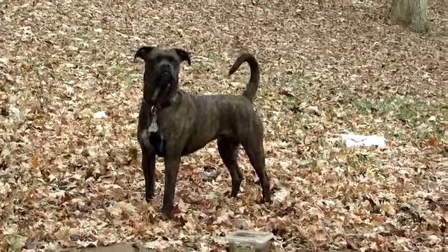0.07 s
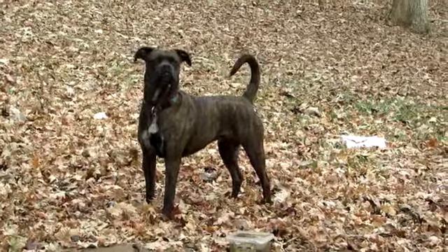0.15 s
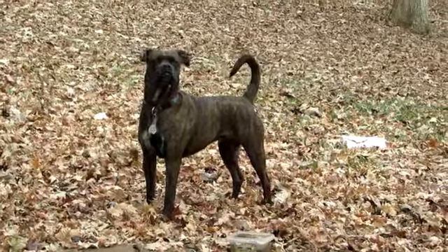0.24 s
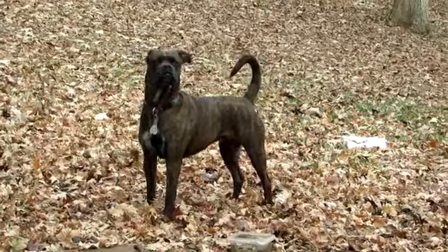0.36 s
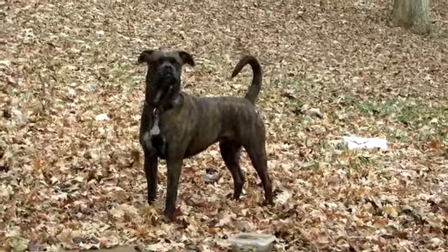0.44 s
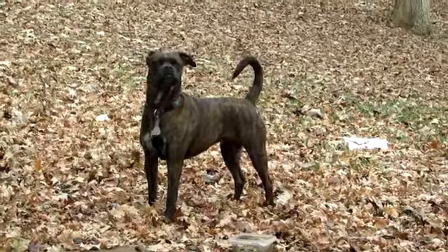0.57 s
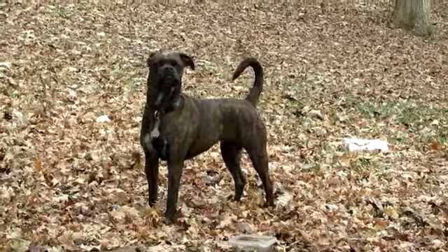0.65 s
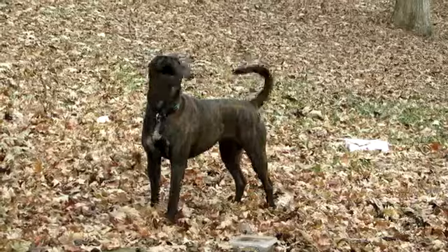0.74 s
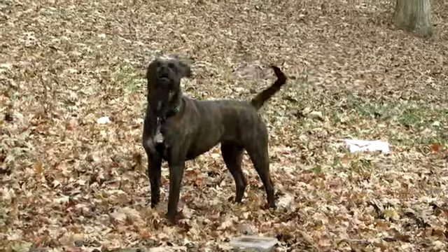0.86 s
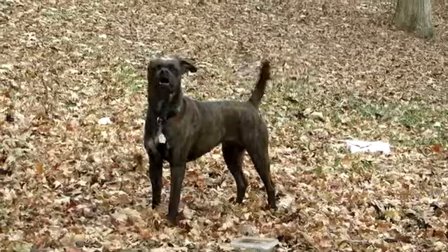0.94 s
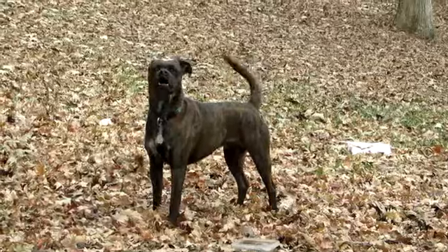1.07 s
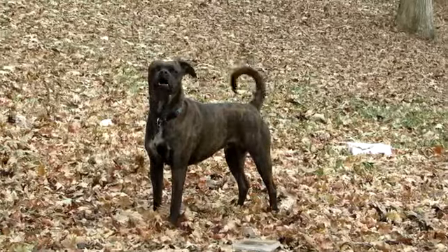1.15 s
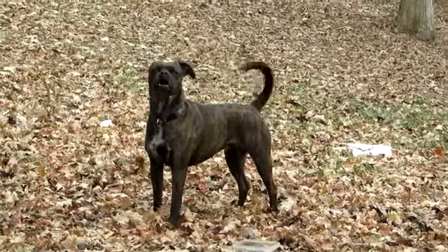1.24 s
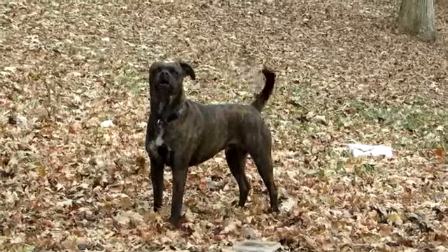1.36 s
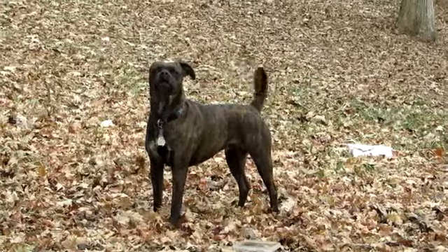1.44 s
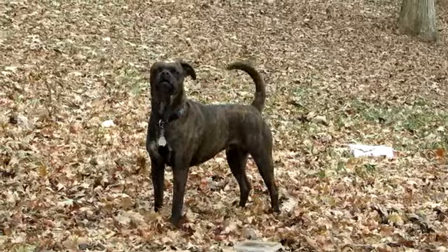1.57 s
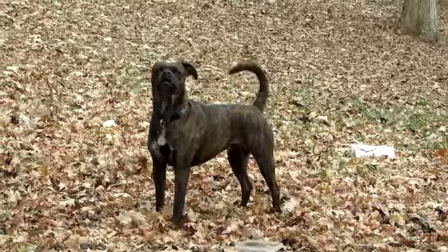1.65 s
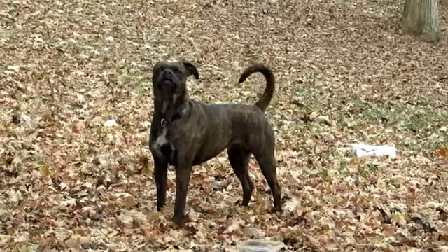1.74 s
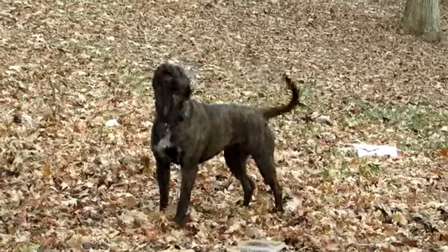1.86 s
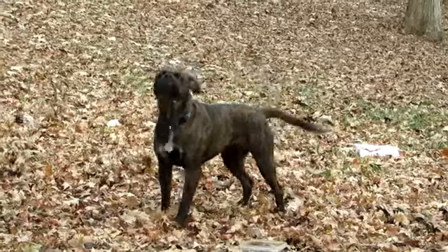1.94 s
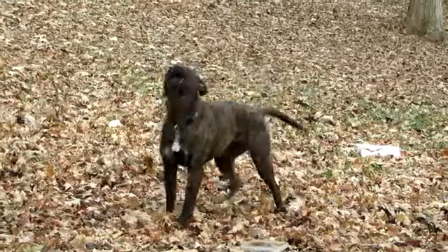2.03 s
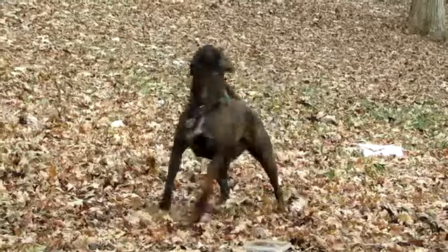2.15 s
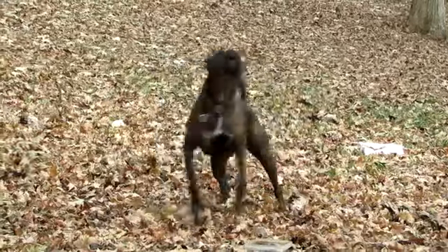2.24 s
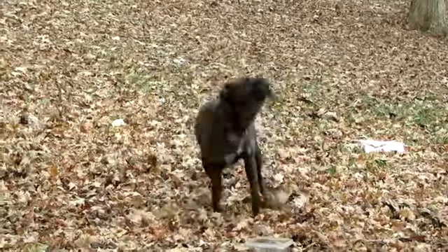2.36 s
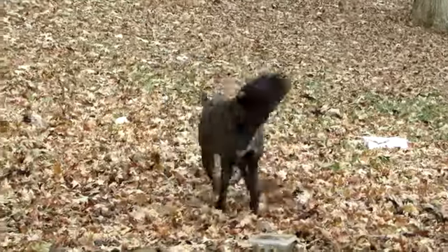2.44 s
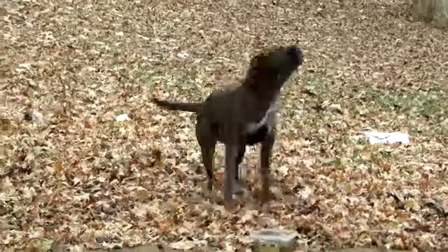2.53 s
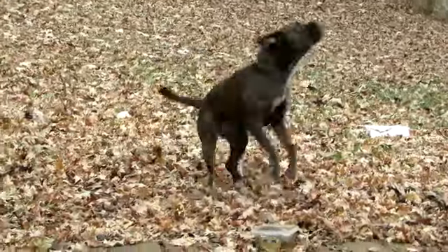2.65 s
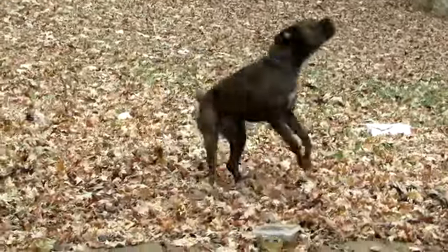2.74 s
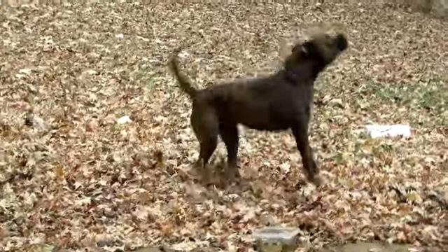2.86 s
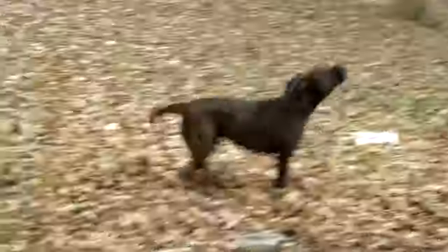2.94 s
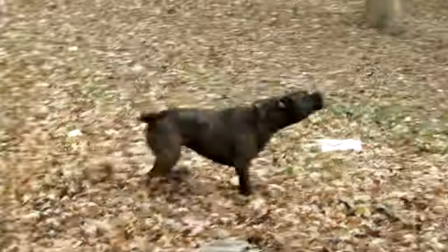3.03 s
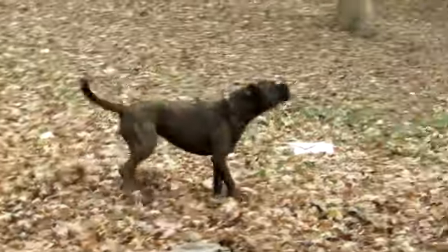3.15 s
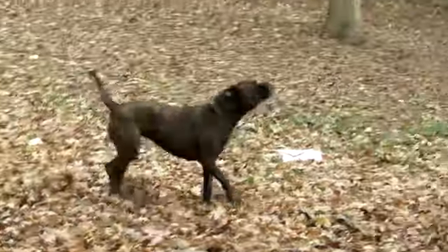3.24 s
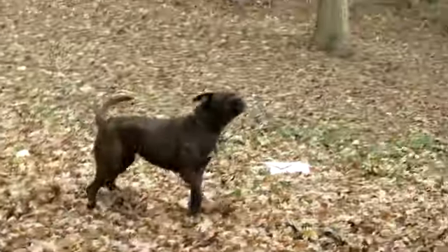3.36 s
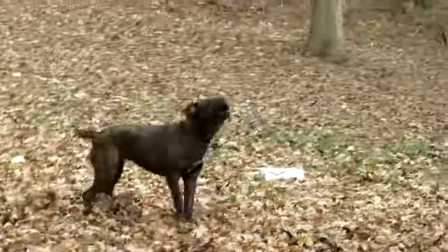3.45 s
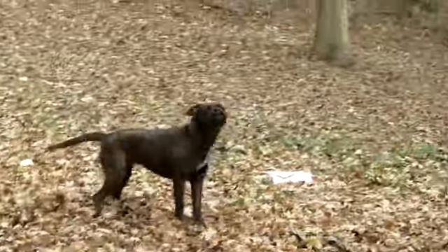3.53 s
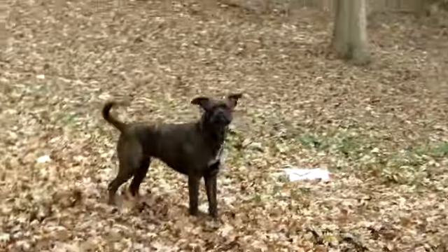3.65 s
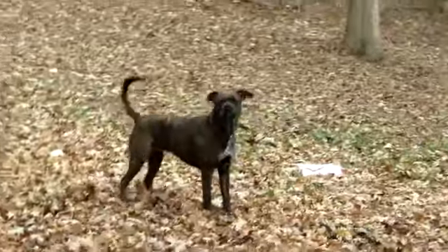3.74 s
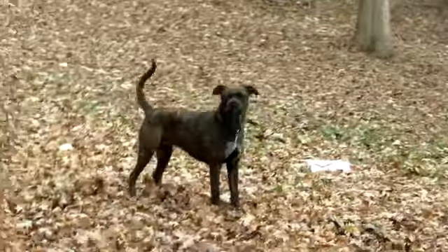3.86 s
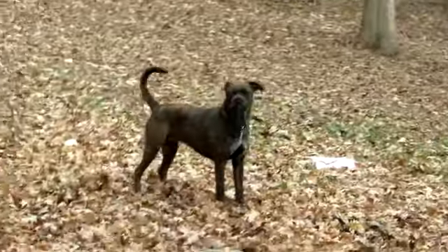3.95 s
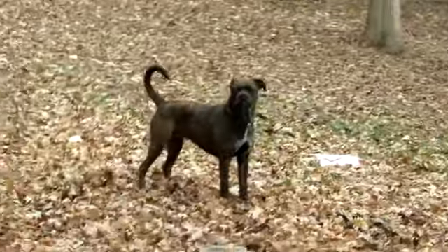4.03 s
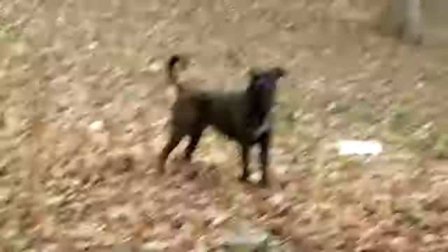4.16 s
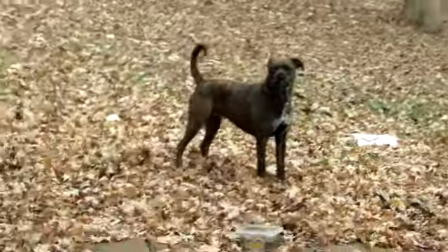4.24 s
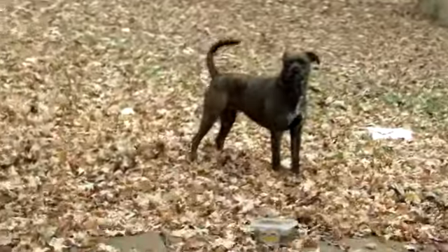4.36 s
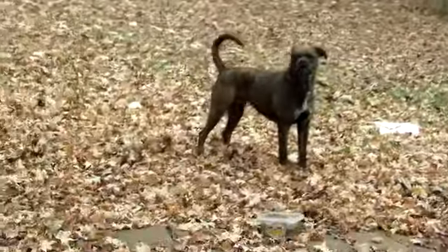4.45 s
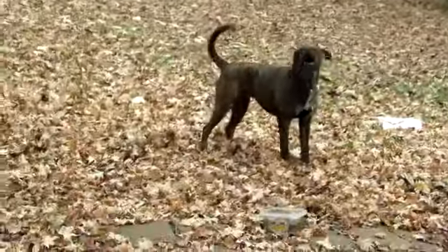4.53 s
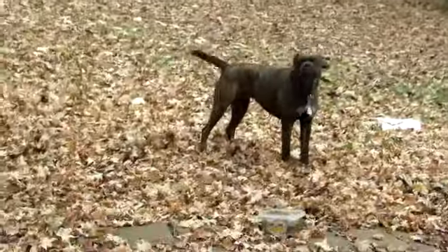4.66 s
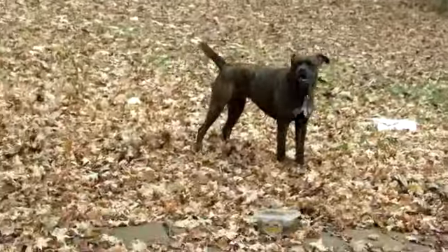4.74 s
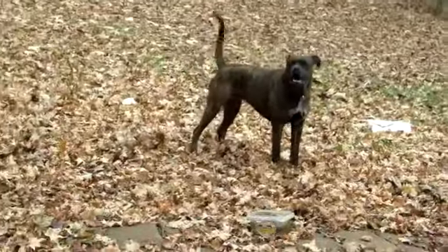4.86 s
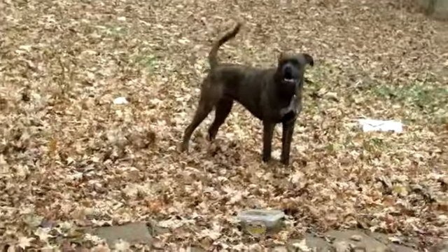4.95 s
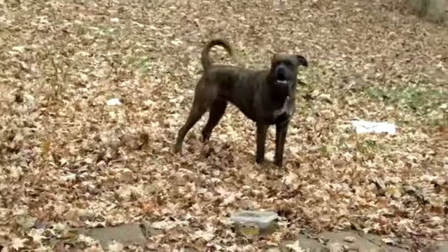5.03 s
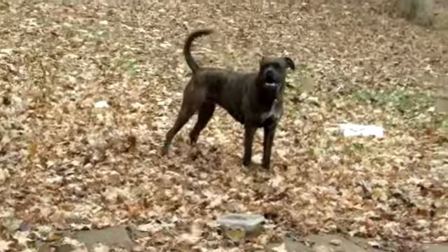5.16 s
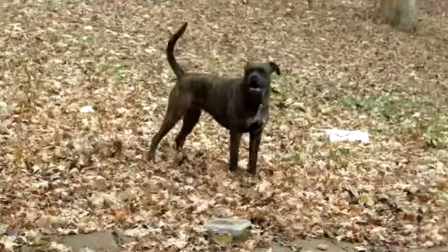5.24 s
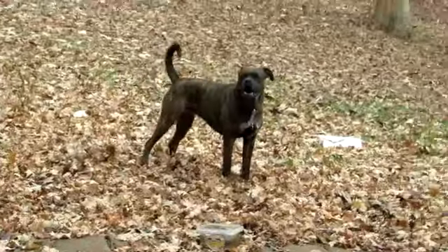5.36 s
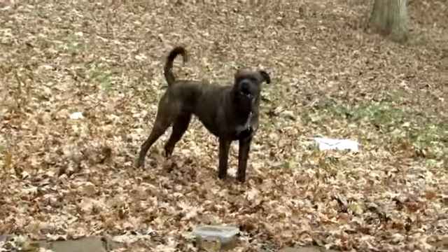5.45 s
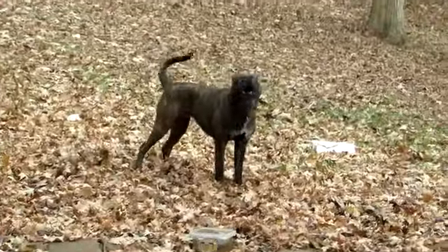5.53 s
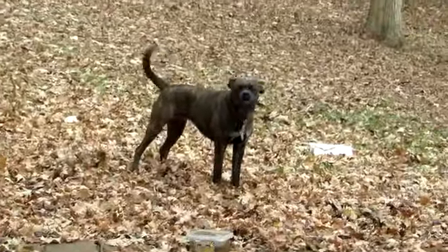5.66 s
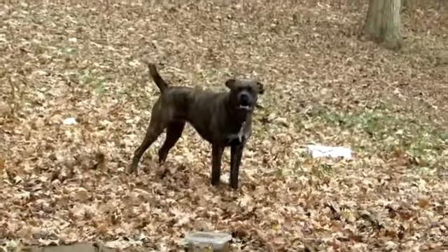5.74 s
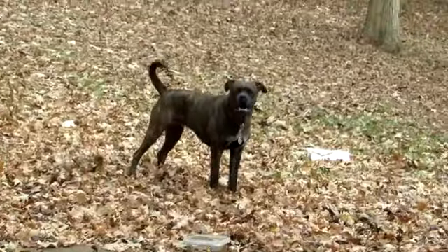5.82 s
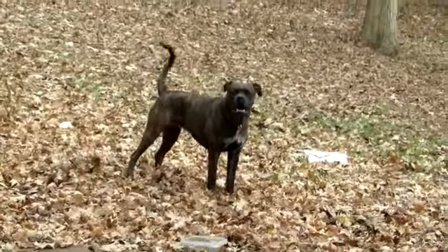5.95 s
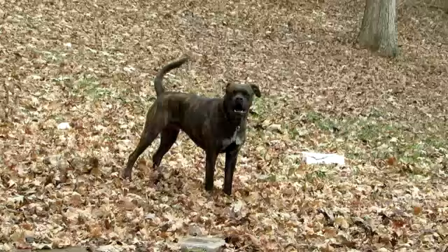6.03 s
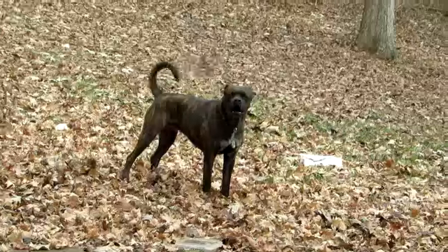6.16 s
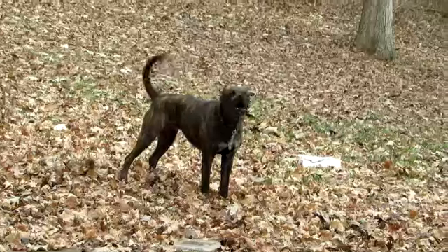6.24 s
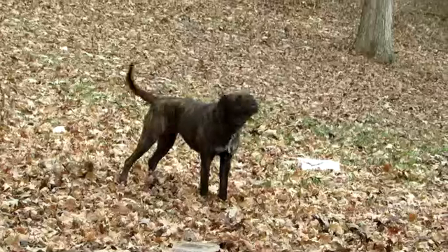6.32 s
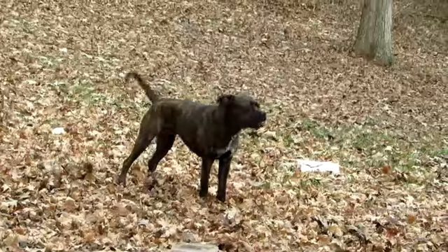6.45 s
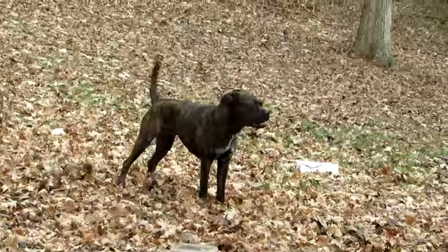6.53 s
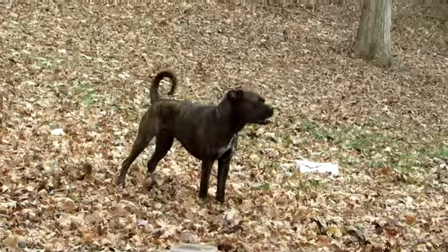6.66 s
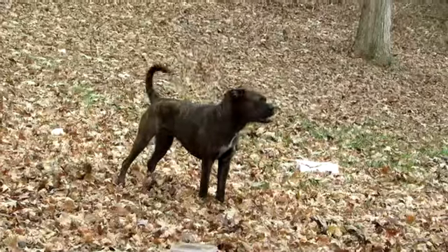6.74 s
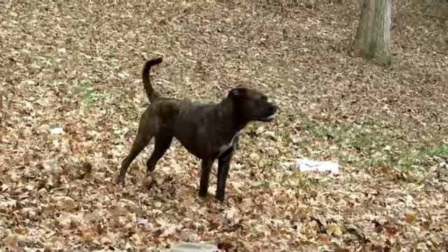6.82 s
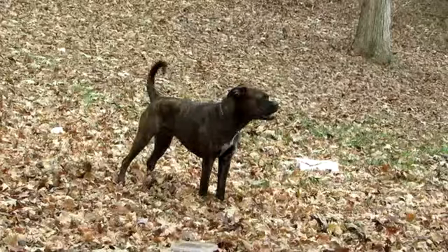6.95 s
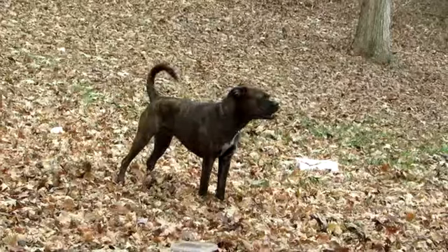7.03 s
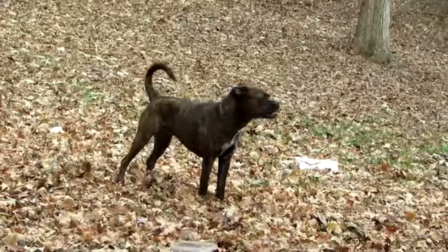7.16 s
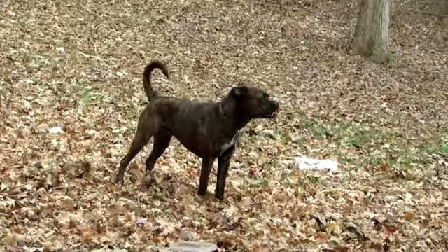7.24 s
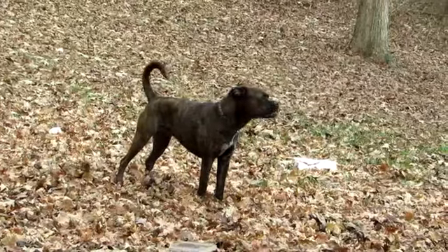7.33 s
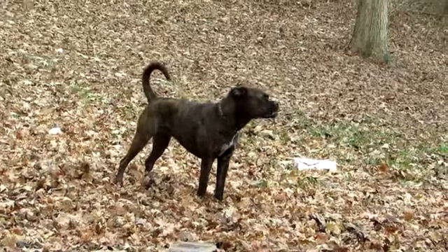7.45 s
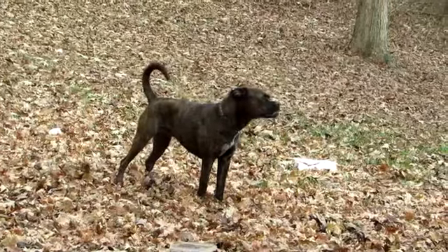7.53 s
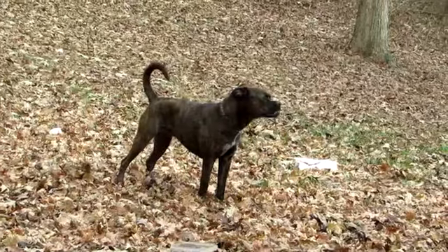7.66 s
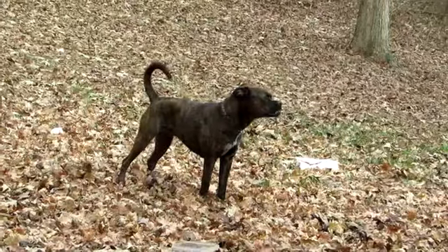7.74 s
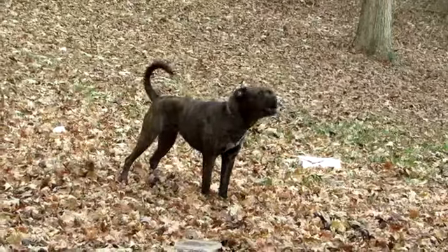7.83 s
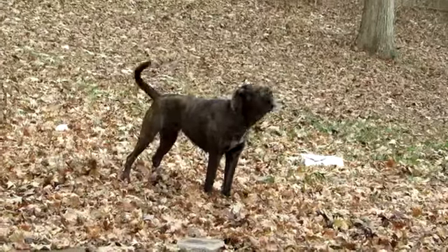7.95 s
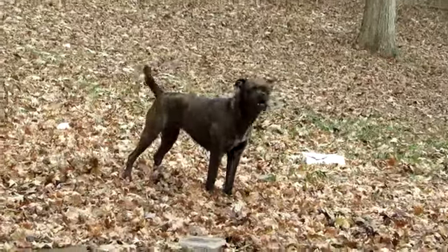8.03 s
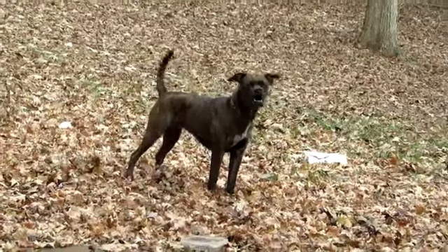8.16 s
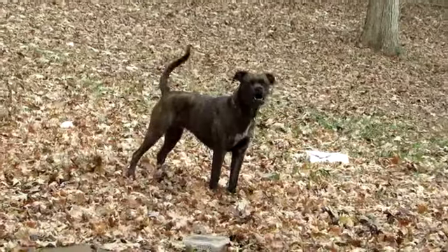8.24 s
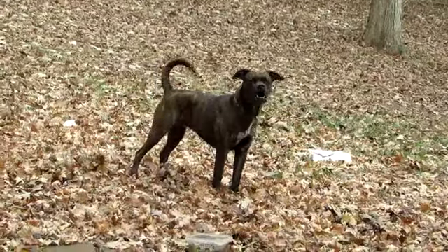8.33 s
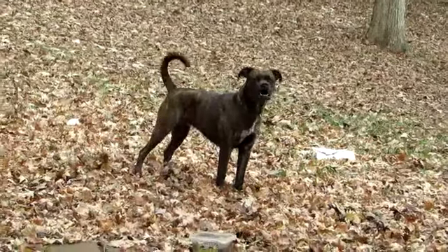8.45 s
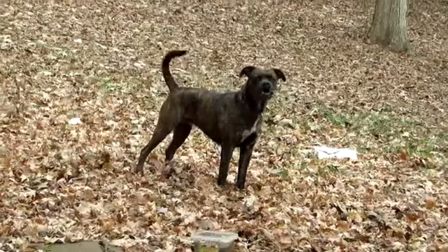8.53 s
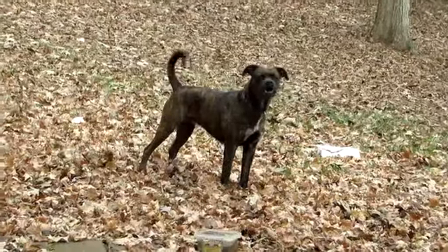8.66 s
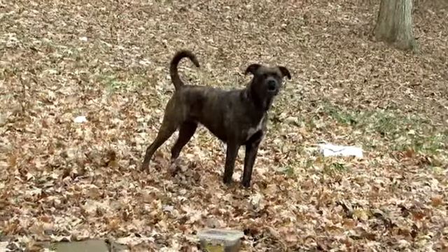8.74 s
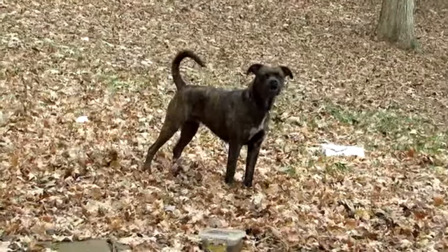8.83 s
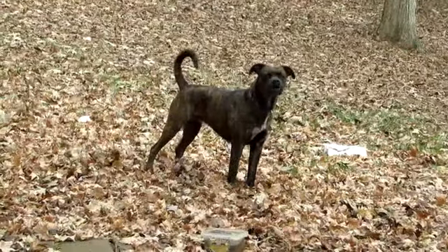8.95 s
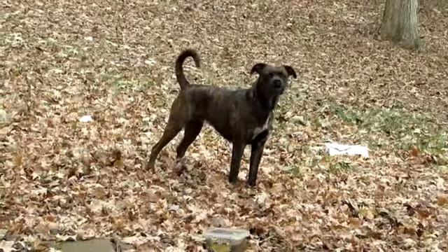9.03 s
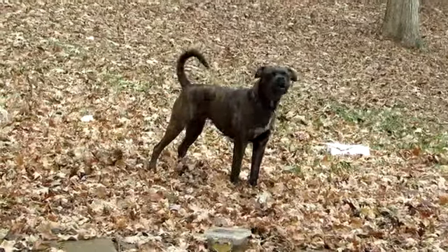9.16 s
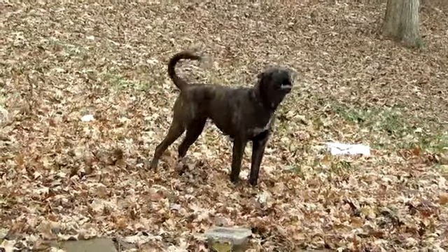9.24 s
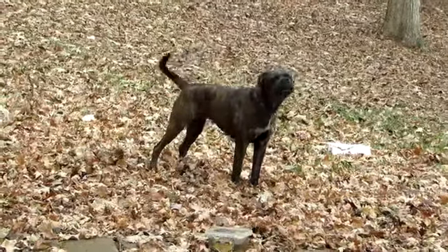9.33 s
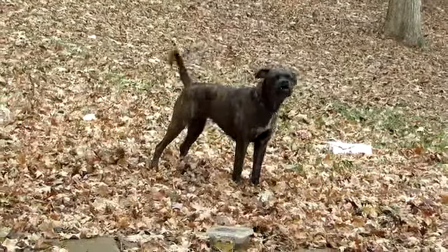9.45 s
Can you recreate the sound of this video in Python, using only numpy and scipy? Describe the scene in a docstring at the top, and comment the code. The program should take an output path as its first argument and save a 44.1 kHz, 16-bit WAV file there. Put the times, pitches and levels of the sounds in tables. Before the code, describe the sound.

Over a faint hum of far traffic, a big dog's rough barks echo around a yard. After the first two it breaks into rapid yelps and a soft rolling howl, with dry leaves crackling underfoot. A sharp snort follows, then spaced single barks to the end. The dog is a few metres off, while a light rattle and a few low bumps are right at the microphone.

```python
"""A leaf-covered suburban yard, with a large dog a few metres from a stereo microphone.
It gives single barks, hoarse where its vocal folds split, and one burst of yelps around a rolling howl.
It scuffs dry leaves as it turns, and snorts; houses and trees return a long echo.
Distant traffic hums throughout and a thin whistle sounds far off. Dry clicks, a light rattle and
low thumps sound close to the microphone, and gain control ducks a little under each bark."""
import sys
import numpy as np
from scipy import signal
from scipy.fft import rfft, irfft, next_fast_len
from scipy.io import wavfile
from scipy.ndimage import uniform_filter1d

SR = 44100
rng = np.random.default_rng(int(sys.argv[2]) if len(sys.argv) > 2 else 0)


def to_wav(sig):
    """Store sig (one row per channel, or 1-D mono) as 16-bit WAV at the path in sys.argv[1].

    Samples outside -1..1 are clipped; the rate is SR.
    """
    pcm = np.clip(np.atleast_2d(sig), -1, 1) * 32767
    pcm = np.round(pcm).astype(np.int16)
    wavfile.write(sys.argv[1], SR, pcm.T)  # frames by channels


N = 418509


def amp(db):
    """Decibels to gain."""
    return 10 ** (np.asarray(db) / 20)


def unit_rms(x):
    """Scales to rms 1."""
    return x / np.sqrt(np.mean(x ** 2) + 1e-20)


def value_at(points, hz):
    """Reads a spectrum on a log-frequency axis."""
    f, value = np.transpose(points)
    return np.interp(np.log(hz + 1), np.log(f + 1), value)


def add(mix, s, sound):
    """Mixes a sound in at time s."""
    part = mix[round(s * SR):][:len(sound)]
    part += sound[:len(part)]


def curves(rows):
    """Sample times, and a table's columns interpolated at them."""
    s, *columns = np.transpose(rows)
    t = np.arange(s[0], s[-1], 1 / SR)
    return t, [np.interp(t, s, c) for c in columns]


def coloured(x, points):
    """Filters by a spectrum of (f/Hz, level/dB) points, to rms 1."""
    size = next_fast_len(len(x) + 2048)
    gain = amp(value_at(points, np.fft.rfftfreq(size, 1 / SR)))
    return unit_rms(irfft(rfft(x, size) * gain, size)[:len(x)])


def wander(count, hz):
    """Random drift up to about hz, rms 1."""
    drift = signal.lfilter(*signal.butter(2, hz, fs=SR), rng.standard_normal(count + 4000))
    return unit_rms(drift[4000:])


def resonate(x, hz, width_hz):
    """A resonance of gain 1 that can glide: shifts hz down to zero, smooths, and shifts back."""
    turn = np.exp(2j * np.pi * np.cumsum(hz * np.ones(len(x))) / SR)
    pole = np.exp(-np.pi * width_hz / SR)
    return 2 * (turn * signal.lfilter([1 - pole], [1, -pole], x / turn)).real


def resonate_twice(x, hz, width_hz):
    """A resonance with steeper skirts."""
    return resonate(resonate(x, hz, width_hz), hz, width_hz)


# Distant traffic as it reaches the yard: f/Hz, relative level/dB
TRAFFIC_SPECTRUM = [(12, -40), (20, -11.5), (77, -5), (161, -8.5), (302, -10.5), (536, -12), (650, -12),
                    (1010, -16.5), (2860, -29), (3970, -32.5), (4940, -31.5), (10400, -39.5), (14000, -48)]
# Slow swell of its treble: t/s, relative level/dB
TRAFFIC_SWELL = [(0, -51), (1.2, -55), (4.5, -48.5), (6.5, -53.5), (9.5, -53)]
# Its likeness on the two sides of the microphone: f/Hz, correlation (clipped to +-1)
TRAFFIC_LIKENESS = [(25, -1.1), (70, 0.87), (240, 0.02), (930, 0.24), (3640, 0.26), (12000, -0.12)]
# Hums of the suburb: f/Hz, width/Hz, level/dB
HUMS = [(77.4, 13.4, -50), (115.2, 12, -61.5), (150.3, 10.8, -59), (533.5, 20, -61)]
def traffic():
    """Far from the microphone, a wash of traffic noise with drifting patches, and wavering hums."""
    frames, hz = N // 256 + 5, np.fft.rfftfreq(1024, 1 / SR)
    left_re, left_im, other_re, other_im, patches = rng.standard_normal((frames, 513, 5)).T
    patches = unit_rms(uniform_filter1d(uniform_filter1d(patches, 14, 0), 40, 1))
    swell_db = np.interp(np.arange(frames) * 256 / SR, *np.transpose(TRAFFIC_SWELL))
    treble = np.clip(np.log2(hz / 500 + 1e-9) / 0.28, 0, 1)[:, None]
    likeness = np.clip(value_at(TRAFFIC_LIKENESS, hz), -1, 1)[:, None]
    left = left_re + 1j * left_im
    right = likeness * left + np.sqrt(1 - likeness ** 2) * (other_re + 1j * other_im)
    shape_db = value_at(TRAFFIC_SPECTRUM, hz)[:, None] + 1.5 * patches
    spectra = np.array([left, right]) * amp(shape_db + treble * (swell_db - swell_db.mean()))
    wash = amp(-46) * unit_rms(signal.istft(spectra, nperseg=1024, noverlap=768)[1][:, :N])
    hums = sum(amp(db) * unit_rms(resonate_twice(rng.standard_normal(N), f, w)) for f, w, db in HUMS)
    return wash + hums


# Decay of the echo among houses and trees: f/Hz, t60/s
ECHO_DECAY = [(250, 0.76), (660, 1.11), (1500, 1.26), (2500, 1.08), (5000, 0.82), (12000, 0.41)]
# Reflections off nearby walls: delay/s, left level/dB, right level/dB
WALLS = [(.004, -16, -22), (.011, -20, -6.5), (.024, -8.5, -15.5)]
def yard_echo(x):
    """A few walls answer first, then sparse reflections, each band dying at its own speed."""
    taps = np.zeros((2, 2 * SR))
    slots = np.arange(900, 2 * SR - 20, 20)
    arrivals = slots + rng.integers(0, 20, (2, len(slots)))
    np.put_along_axis(taps, arrivals, rng.choice([-1., 1.], arrivals.shape), 1)
    taps[1] = 0.7 * taps[0] + 0.68 * taps[1]  # the two sides are partly alike
    hz, t, spectra = signal.stft(taps, SR, nperseg=256)
    decay = amp(-60 * t / value_at(ECHO_DECAY, hz)[:, None])
    response = signal.istft(spectra * decay, SR, nperseg=256)[1]
    response *= amp(-21.5) / np.linalg.norm(response[0])
    for s, left_db, right_db in WALLS:
        response[:, round(s * SR)] += amp([left_db, right_db])
    return signal.fftconvolve(x[None], response, axes=1)[:, :len(x)]


# The dog's throat with the mouth wide: f/Hz, relative level/dB
MOUTH_WIDE = [(200, -47), (400, 0), (600, -7.5), (900, 2), (1180, -3), (1520, -6.5), (1850, -12.5),
              (2450, -12.5), (2850, -8.5), (3200, -11.5), (3900, -17.5), (5000, -74.5)]
# Its throat with the mouth nearly shut: f/Hz, relative level/dB
MOUTH_SHUT = [(200, 5), (500, -1), (1050, 4), (1500, -30), (2050, 13.5), (2300, -16), (2700, -59),
              (5000, -45)]
# Resonances of the hoarse noise: f/Hz, width/Hz, relative level/dB
RASP_MODES = [(571, 200, -3), (930, 86, 6.5), (1414, 510, 2.5), (2535, 210, -4), (3270, 420, -12)]
# Hiss of the breath: f/Hz, relative level/dB
BREATH_SPECTRUM = [(3200, -30), (4000, -14), (4900, -3), (5700, -8), (6400, 3), (7100, -4), (7900, -12),
                   (8500, -7), (11000, -14), (14000, -22)]
def voice(effort_db, hz, rough, overtone_db, split_hz=800, breath_db=0.5):
    """Vocal folds make harmonics that split and break into jitter, rasp and hiss as they turn rough."""
    count, rough = len(hz), np.clip(rough, 0, 1)
    gape = np.clip((effort_db.max() + 23.5) / 8, 0, 1)  # loud calls are given with the mouth wide
    k = np.arange(1, 11)[:, None]
    line_hz = k * np.where(k == 2, np.minimum(hz, split_hz), hz)  # harmonic 2 sticks at the split
    jitter = .06 * rough * (1 + 0.56 * (line_hz < k * hz)) + 0.0046 * gape
    cycles = np.cumsum(line_hz * (1 + jitter * wander(count, 150)), axis=1) / SR
    tract_db = gape * value_at(MOUTH_WIDE, line_hz) + (1 - gape) * value_at(MOUTH_SHUT, line_hz)
    rolloff_db = 7.4 + 2.5 * rough + 4.7 * np.maximum(hz / split_hz - 1, 0)
    heights = amp(tract_db - tract_db[0] + overtone_db * (k > 1) - rolloff_db * np.maximum(k - 2, 0))
    folds = (heights * np.cos(2 * np.pi * cycles)).sum(0) / np.sqrt((heights ** 2).sum(0) / 2)
    folds *= 1 + .5 * np.tanh(1.5 * rough * wander(count, 140))  # uneven closing shakes the level
    puffs = (0.17 + np.exp(-(cycles[0] % 1) / 0.13)) * rng.standard_normal((2, count))
    rasp = unit_rms(sum((-1) ** i * amp(db) * unit_rms(resonate(puffs[0], f, w))
                        for i, (f, w, db) in enumerate(RASP_MODES)))
    # The rasp is thin below about 400 Hz.
    rasp = signal.sosfilt(signal.butter(4, 420, "high", fs=SR, output="sos"), rasp)
    lag_db = -14 * np.exp(-np.arange(count) / SR / 0.013)  # the hiss builds up after the voice
    airflow_db = 14 * np.log2(hz / 600) + 1.6 * rough  # more air passes at high, rough pitch
    hiss = amp(breath_db + lag_db + airflow_db - 29.5) * coloured(puffs[1], BREATH_SPECTRUM)
    sound = np.sqrt(1 - rough ** 2) * folds + (1.18 * rough + 0.012 * gape) * rasp + hiss
    return amp(effort_db + 1.61 * wander(count, 34)) * sound * signal.windows.tukey(count, .06)


# Hard barks, a few metres off: t/s; grunt, climb, tail length/s; grunt, peak, break, tail level/dB;
# grunt, jump, top, tail, split f/Hz; haste of the climb (exponent); overtone, breath offset/dB
BARKS = [ (0.7, 0.0019, .07, 0.042, -12, -6.5, -16, -21.5, 589, 625.2, 977, 492, 785, 1.14, 18, 1),
         (1.778, 0.0079, 0.082, 0.051, -20.5, -6.5, -14, -28.5, 420.2, 580.2, 930, 449, 826, 1.46, 6, -0.5),
         (4.499, .012, 0.083, 0.029, -22, -6, -12.5, -21.5, 542.5, 657.4, 930, 535, 705, 1.39, 7, 0),
         (5.477, 0.017, 0.078, 0.027, -9, -8, -17, -30.5, 515.4, 670.5, 842.7, 497, 723.6, 2.42, 8.5, 0.4),
         (6.236, .022, .075, 0.031, -9.5, -4.5, -19.5, -24, 519.6, 679.5, 900.4, 517, 715.4, 2.01, 7, -1),
         (7.809, .013, 0.092, 0.033, -17, -6.5, -15, -24, 515.4, 618, 937, 499, 768, 1.1, 14, -5),
         (9.163, .002, 0.1, 0.044, -16, -6, -17, -24.5, 423.8, 540.2, 987, 499, 784, 1.4, 12, 0.5), ]
def bark(start, grunt, climb, tail, grunt_db, peak_db, break_db, tail_db,
         grunt_hz, jump_hz, top_hz, tail_hz, split_hz, haste, overtone_db, breath_db):
    """A grunt jumps and climbs in pitch until the folds split hoarsely, then breaks to a low tail."""
    scoop_s, swell_s, jump_s, break_s = .018, .008, .009, .017
    stages = [scoop_s, swell_s, grunt, jump_s, climb, break_s, tail]
    scooped, opened, jumps, climbs, breaks, broken, end = np.cumsum(stages)
    t = np.arange(0, end, 1 / SR)
    rising_hz = np.interp(t, [0, opened, jumps, climbs], [.55 * grunt_hz, grunt_hz, grunt_hz, jump_hz])
    rising_hz += (top_hz - jump_hz) * (1 - (1 - np.clip((t - climbs) / climb, 0, 1)) ** haste)
    in_tail = np.clip((t - breaks) / break_s, 0, 1)
    sag = np.interp(t, [broken, end], [1, 0.73])
    hz = (1 - in_tail) * rising_hz + in_tail * tail_hz * sag
    ratio = rising_hz / split_hz
    split = np.clip((ratio - 1) / 0.075, 0, 1)
    effort_db = np.interp(
        t, [0, scooped, opened, jumps, climbs, climbs + 0.18 * climb, breaks, broken, end],
        [grunt_db - 39.5, grunt_db - 21, grunt_db, grunt_db, peak_db - 3.5, peak_db,
         break_db, tail_db, tail_db - 11])
    effort_db -= 3.5 * np.exp(-((ratio - 1.074) / 0.051) ** 2)  # a stumble just past the split
    rough = .22 + .28 * split + .29 * np.maximum(1 - t / opened, 0)
    rough = (1 - in_tail) * rough + in_tail * .6
    # Overtones grow from the grunt to the split, ease past it, and sink in the tail.
    bright_db = np.interp(rising_hz, [grunt_hz, split_hz], [-8.5, overtone_db]) - 9 * split
    bright_db = (1 - in_tail) * bright_db - in_tail * 10
    return start, voice(effort_db, hz, rough, bright_db, split_hz, breath_db)


def ground_scatter(x):
    """The leafy ground throws back the treble within a few ms, differently to each side."""
    t = np.arange(600) / SR
    grains = rng.standard_normal((2, 600)) * np.exp(-t / 0.016)
    grains = signal.lfilter(*signal.butter(2, 2500, "high", fs=SR), grains)
    return amp(-5.5) * signal.fftconvolve(x[None], grains / np.linalg.norm(grains[0]), axes=1)[:, :N]


# A faint falling tone, far from the yard: t/s, f/Hz, level/dB
FAR_WHISTLE = [(1.33, 923, -64), (1.42, 940, -54), (1.5, 928, -65), (1.6, 870, -48.5), (1.69, 865, -73)]
def far_whistle():
    """A thin, blurred whistle: noise in a narrow, gliding resonance."""
    t, (hz, db) = curves(FAR_WHISTLE)
    out = np.zeros(N)
    add(out, t[0], amp(db) * unit_rms(resonate(rng.standard_normal(len(t)), hz, width_hz=3.1)))
    return out


# Low thumps right on the microphone: t/s, level/dB, t60/s
THUMPS = [(1.761, -40, 0.32), (4.654, -33, 0.21), (6.36, -20.5, 0.29), (6.472, -30, 0.27),
          (7.799, -41, 0.52), (9.128, -37, 0.56)]
def microphone_thumps():
    """Short lumps of noise, mostly under 300 Hz."""
    out, t = np.zeros(N), np.arange(12000) / SR
    spectrum = [(30, -38), (70, 2), (140, -7), (300, -9), (600, -51)]
    for s, db, t60 in THUMPS:
        lump = coloured(rng.standard_normal(len(t)), spectrum)
        add(out, s, lump * amp(db - 60 * t / t60) * np.minimum(t / 0.0019, 1))
    return out


# Yelps, a few metres off: t/s; arch, tail length/s; share of the arch before the leap;
# burst, held, tail level/dB; start, top, end f/Hz; overtone offset/dB; roughness 0-1; leap's share
YELPS = [ (2.04, .125, 0.049, 0.27, -9, -16.5, -33.5, 447.6, 680, 428, -0.5, .1, .11),
         (2.24, .13, 0.045, 0.24, -21, -20, -32.5, 418, 601.5, 429, -5, 0.06, 0.19),
         (2.42, 0.14, 0.033, .14, -25.5, -21.5, -33, 379, 564.5, 407.4, -6, 0.09, 0.18),
         (3.145, .14, 0.077, .13, -22, -23.5, -32, 401.6, 587, 341.5, -6.5, 0.09, .24),
         (3.412, 0.14, 0.031, 0.19, -9.5, -12.5, -20, 437.7, 658, 393, -1.5, 0.14, 0.21), ]
def yelp(start, arch, tail, leap, burst_db, held_db, tail_db,
         start_hz, top_hz, end_hz, overtone_db, rough, leap_share):
    """An arch in pitch: a burst, a leap to a held top, and a sagging tail as the mouth shuts."""
    progress = np.arange(0, arch + tail, 1 / SR) / arch
    landed, shuts, end = leap + leap_share, 0.59, 1 + tail / arch
    low_hz = np.interp(progress, [0, 1, end], [start_hz, end_hz, end_hz * 0.861])
    lift = np.interp(progress, [0, leap, landed, .6, .8, 1], [0, .15, .9, 1, .6, 0])
    hz = low_hz + (top_hz - low_hz) * lift
    hz = uniform_filter1d(hz, size=SR // 70, mode="nearest")  # the folds round off every corner
    effort_db = np.interp(
        progress, [0, 0.16, leap + .04, landed + 0.027, shuts, 1, end],
        [burst_db - 33, burst_db - 0.5, burst_db, held_db, held_db, tail_db, tail_db - 6.5])
    shut_db = -8.5 * np.maximum(progress - shuts, 0) / (1 - shuts)
    return start, voice(effort_db, hz, rough, overtone_db + shut_db)


# High fizz of dry leaves: f/Hz, relative level/dB
FIZZ_SPECTRUM = [(3000, -27), (6000, -4.5), (9000, 3), (12600, 2.5), (14000, 1.5)]
# Their crunch under a heavy step: f/Hz, relative level/dB
CRUNCH_SPECTRUM = [(600, -3.5), (1500, -3), (2560, -2), (4000, -4.5), (5000, -2), (7000, -11.5),
                   (10000, -21.5)]
# Paws scuffing the yard's floor: middle t/s, length/s, fizz level/dB, crunch offset/dB
SCUFFS = [(2.445, 0.8, -52, -0.5), (2.84, 0.23, -47, 3), (2.99, 0.26, -48, 4.5), (3.195, 0.42, -53.5, 1),
          (3.32, 0.13, -49, 1.5), (3.46, 0.33, -45.5, 3.5), (3.732, 0.42, -49.5, 14),
          (3.888, 0.73, -58.5, 13.5)]
def leaves():
    """Dense crackle of many tiny snaps, unlike on the two sides; heavy steps add a lower crunch."""
    fizz, crunch = np.zeros((2, N))
    for s, length, db, crunch_db in SCUFFS:
        stroke = np.hanning(round(length * SR))
        add(fizz, s - length / 2, amp(db) * stroke)
        add(crunch, s - length / 2, amp(db + crunch_db - 3) * stroke)
    sizes = amp(1.2 * rng.exponential(1, (3, N)))
    snaps = sizes * (rng.random((3, N)) < .15) * rng.standard_normal((3, N))
    crackle = snaps[2] + 1.1 * snaps[:2]  # shared snaps plus each side's own
    return np.array([fizz * coloured(side, FIZZ_SPECTRUM) + crunch * coloured(side, CRUNCH_SPECTRUM)
                     for side in crackle])


# The howl between the yelps: t/s, level/dB, f/Hz
HOWL = [(2.59, -33, 377.7), (2.615, -27, 428.4), (2.63, -27, 456.6), (2.664, -30, 540), (2.748, -33.5, 427),
        (2.83, -32.5, 543), (2.9, -33, 442.5), (3.0, -35.5, 569), (3.025, -30.5, 583), (3.06, -39, 390),
        (3.13, -29.5, 325.5)]
def howl():
    """One long soft call whose pitch rolls up and down three times before the mouth shuts."""
    t, (effort_db, hz) = curves(HOWL)
    shut_db = -25 * np.maximum(1 - (t[-1] - t) / 0.068, 0)
    return t[0], voice(effort_db, hz, rough=0.078, overtone_db=-12.5 + shut_db)


# Modes of the rattle: f/Hz, width/Hz, relative level/dB
RATTLE_MODES = [(1335, 890, 18), (1750, 290, 11), (2550, 1460, 16), (3240, 980, -11), (4650, 1200, 1),
                (7060, 1460, -10.5)]
# Dry clicks and a light rattle close to the microphone: t/s, peak level/dB, tilt/(dB per octave)
RATTLE_CLICKS = [(3.9532, -22.5, -32), (4.0003, -20, -33), (4.0509, -19, -10), (4.2368, -18, 7.5),
                 (4.3197, -14.5, 12), (4.3354, -7.5, 17), (5.9326, -32.5, -12), (5.9716, -29.5, -3),
                 (6.0556, -27.5, -11), (6.1043, -33.5, -17.5), (6.1389, -30.5, -9), (6.1868, -33, -5),
                 (6.2238, -29, -9), (6.978, -43, 19), (9.4314, -29, 8)]
def rattle():
    """Each click is a spit of noise a few ms long ringing short modes."""
    out, t = np.zeros(N), np.arange(1500) / SR
    for s, db, tilt in RATTLE_CLICKS:
        spit = rng.standard_normal(len(t)) * np.exp(-t / 0.004)
        ring = sum(amp(mode_db + tilt * np.log2(f / 1500)) * resonate_twice(spit, f, w) / np.sqrt(w)
                   for f, w, mode_db in RATTLE_MODES)
        add(out, s, amp(db) * ring / abs(ring).max())
    return out


# Air in the dog's nose: f/Hz, relative level/dB
NOSE_SPECTRUM = [(250, -5), (400, 10), (800, -9), (1450, 5), (3000, -10.5), (4000, -12), (7500, -21),
                 (10000, -26), (13000, -28)]
# Sniffs and a snort, puff by puff: peak t/s, rise/s, fall/s, drive level/dB, nasal ring f/Hz
SNORTS = [(3.957, 0.0028, .035, -36, 1504), (4.17, 0.038, 0.12, -35.5, 1400),
          (4.244, 0.028, 0.013, -25.5, 1870), (4.325, 0.0087, 0.013, -30, 2420),
          (4.338, .004, .016, -3, 2450), (4.358, 0.0089, 0.0082, -7.5, 2300),
          (4.388, .025, 0.014, -29, 2140)]
def snort(s, rise, fall, peak_db, hz):
    """Fluttering air through the nostrils; the harder the blast, the more it rings."""
    t, (db,) = curves([(s - rise, peak_db - 12), (s, peak_db), (s + fall, peak_db - 12)])
    air = rng.standard_normal(len(t)) * amp(2 * wander(len(t), 352))
    ring = amp(1.02 * (db + 17)) * unit_rms(resonate(resonate(air, hz, 930), hz, 1040))
    sound = coloured(air, NOSE_SPECTRUM) + ring
    return t[0], amp(db) * sound / np.sqrt(1 + amp(1.9 * (db + 30)))  # hard puffs are held back


# Balance of the dog and the clicks at the microphone: t/s, left minus right level/dB
NEAR_PAN = [(0, 3), (2.8, 0.5), (4.2, 4), (7.501, -1)]
def scene():
    """Dog and clicks, their echo (also that of a bark just before the start), and the surroundings."""
    calls, noises = np.zeros(N), rattle()
    for call in [bark(*row) for row in BARKS] + [yelp(*row) for row in YELPS] + [howl()]:
        add(calls, *call)
    for row in SNORTS:
        add(noises, *snort(*row))
    lead_in = np.zeros(SR // 2)
    add(lead_in, .12, amp(-5) * bark(*BARKS[3])[1])
    echo = yard_echo(np.r_[lead_in, calls + .3 * noises])[:, len(lead_in):]
    pan_db = np.interp(np.arange(N) / SR, *np.transpose(NEAR_PAN))
    near = calls + noises
    foreground = near * amp([pan_db / 2, -pan_db / 2]) + ground_scatter(near)
    return foreground + echo + leaves() + microphone_thumps() + far_whistle() + traffic()


# Narrow notches near 4 and 8 kHz in the whole sound: f/Hz
TREBLE_NOTCHES = [3960, 7900]
def record(dry):
    """Gain control ducks under barks, the tallest peaks round off, the treble is notched and cut."""
    recovery_db_per_s, threshold_db, edge_hz = 33, -27.5, 14150
    power_db = 10 * np.log10(abs(uniform_filter1d((dry ** 2).mean(0), 600)) + 1e-12)
    recovery_db = np.arange(N) * recovery_db_per_s / SR
    held_db = np.maximum.accumulate(power_db + recovery_db) - recovery_db
    excess_db = np.maximum(held_db - threshold_db, 0)
    sound = dry / amp(0.19 * uniform_filter1d(excess_db, 300) - 1.5)
    sound = sound / (1 + sound ** 4) ** .25
    for hz in TREBLE_NOTCHES:
        sound = .25 * sound + .75 * signal.lfilter(*signal.iirnotch(hz, hz / 250, SR), sound)
    lowpass = signal.firwin(511, edge_hz, window=("kaiser", 9), fs=SR)
    return signal.oaconvolve(sound, lowpass[None], "same")


dry = scene()
out = record(dry)
to_wav(out)
```